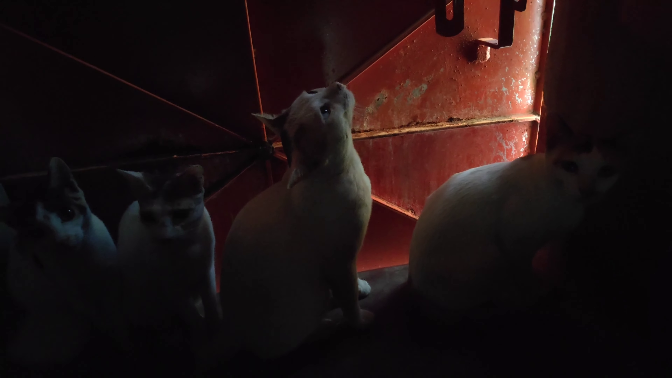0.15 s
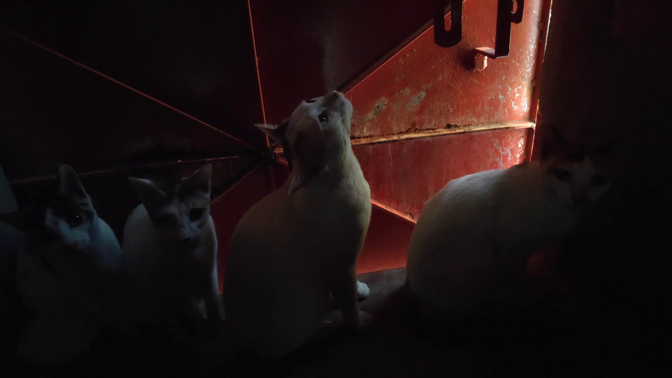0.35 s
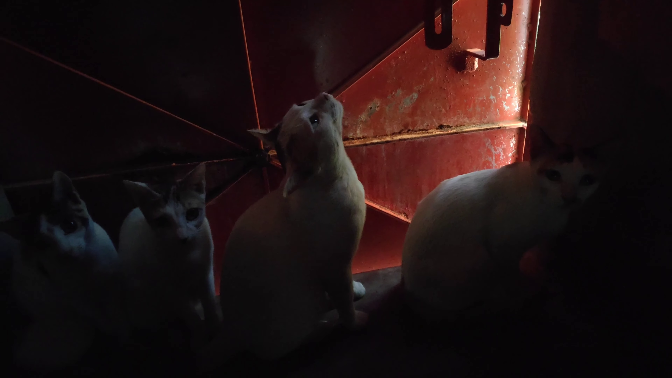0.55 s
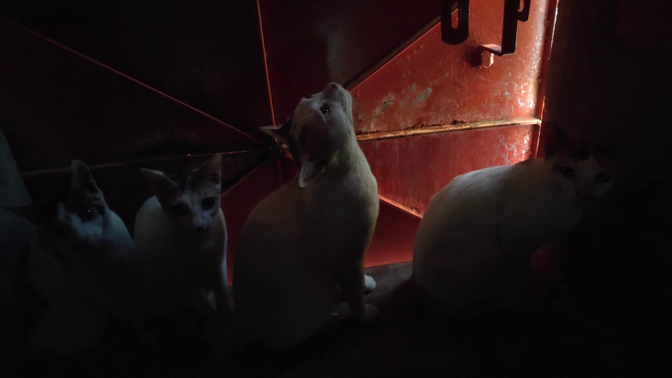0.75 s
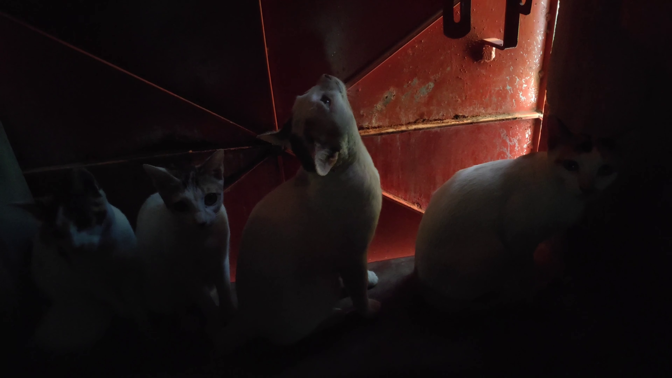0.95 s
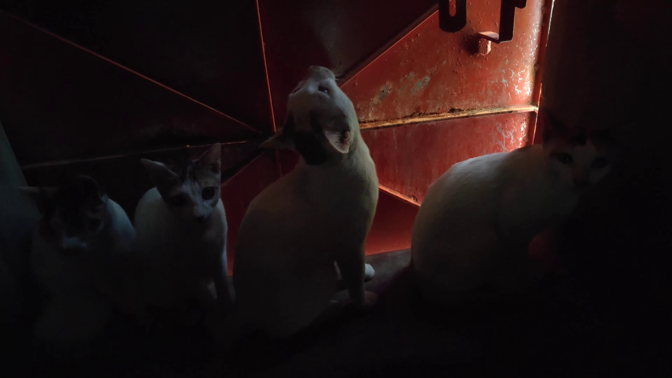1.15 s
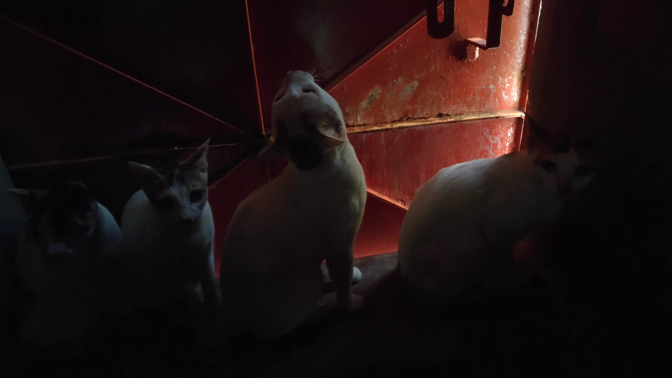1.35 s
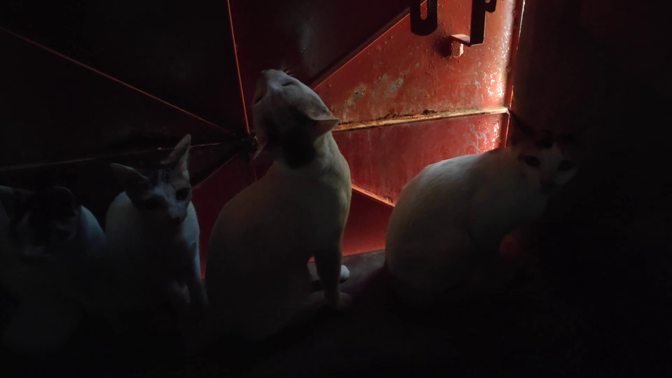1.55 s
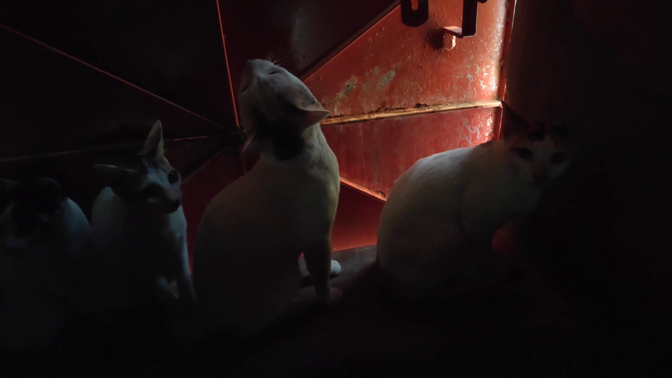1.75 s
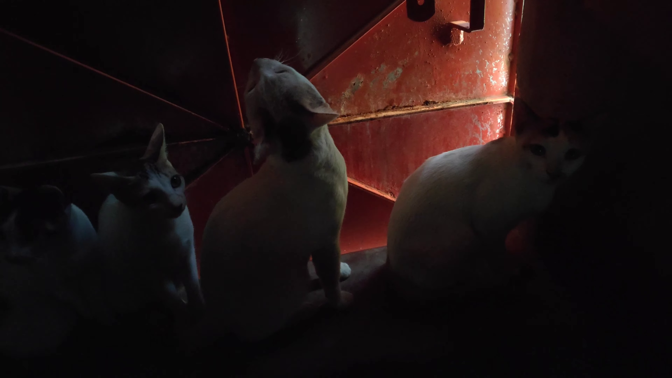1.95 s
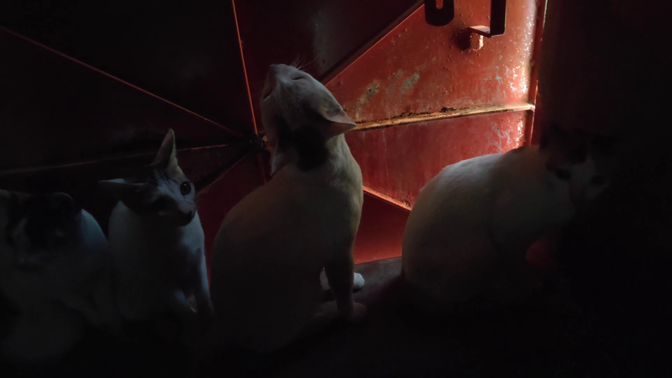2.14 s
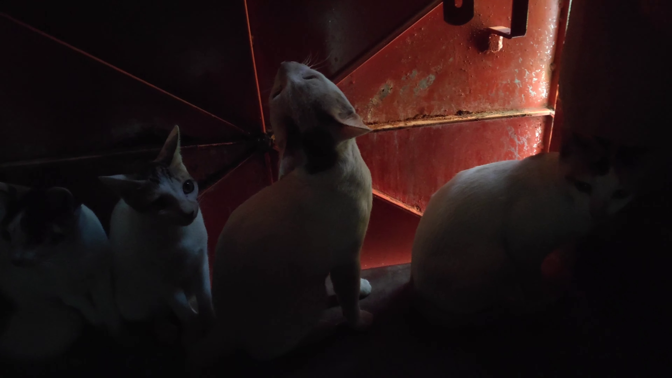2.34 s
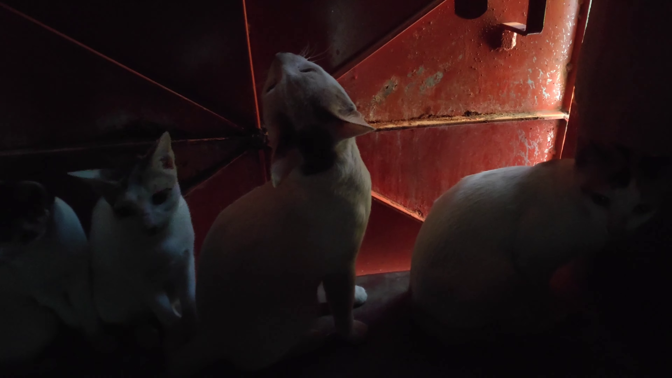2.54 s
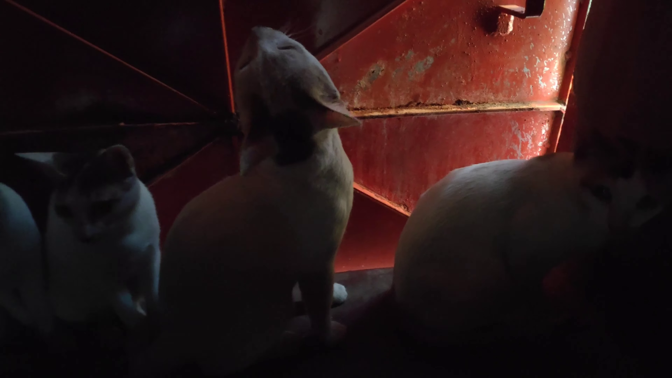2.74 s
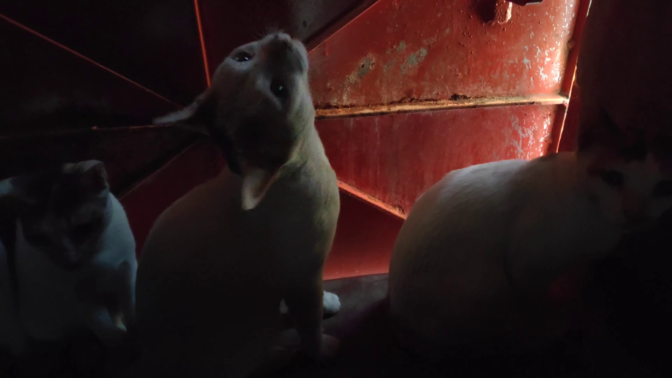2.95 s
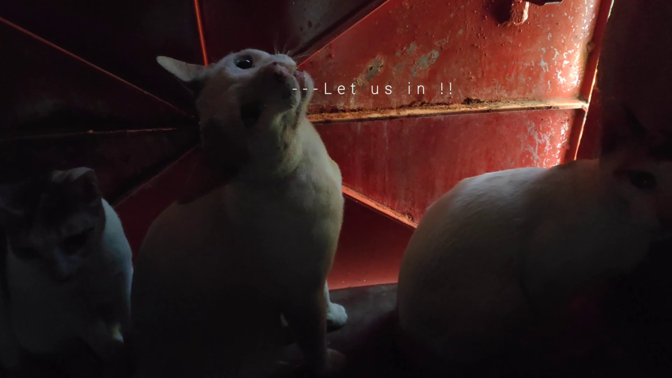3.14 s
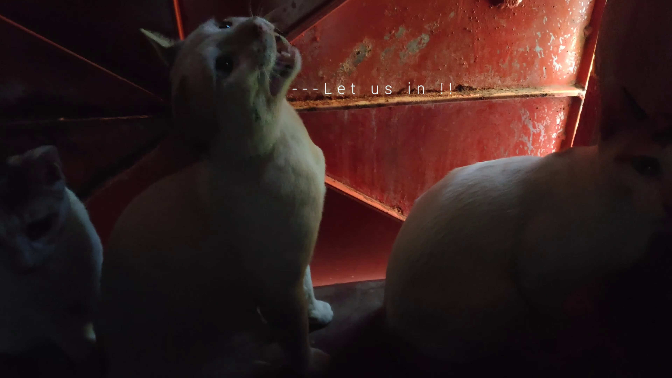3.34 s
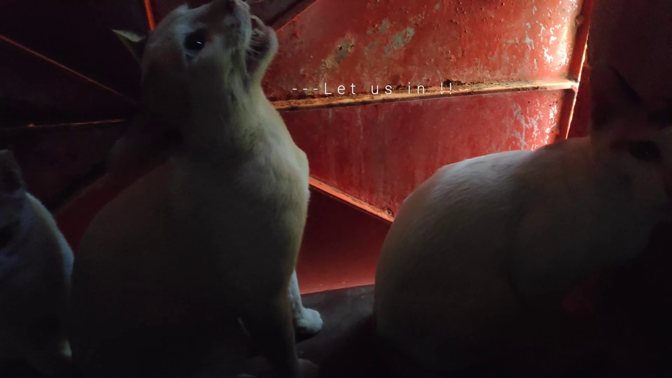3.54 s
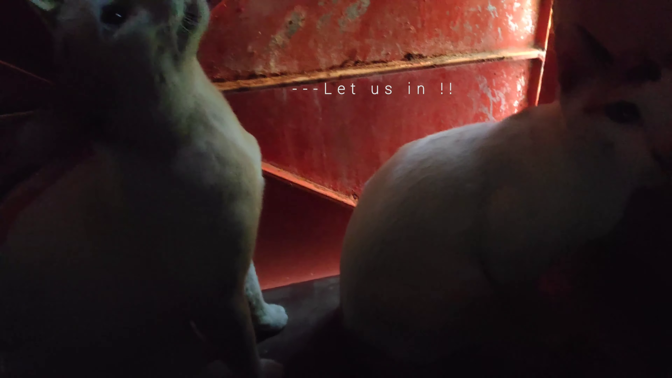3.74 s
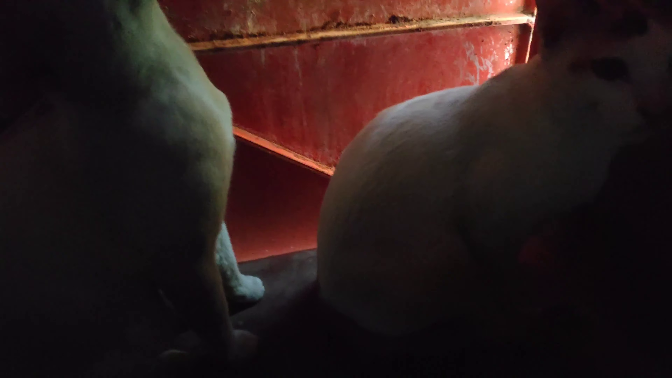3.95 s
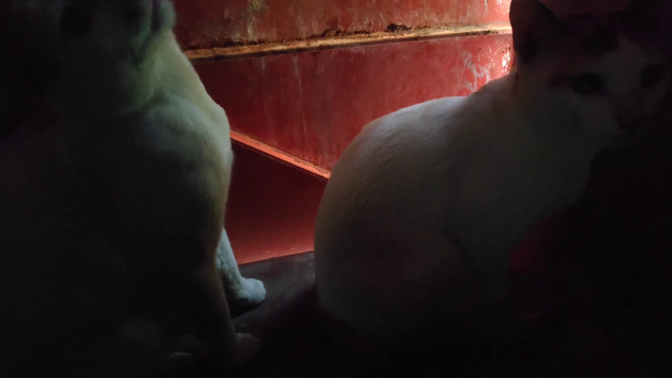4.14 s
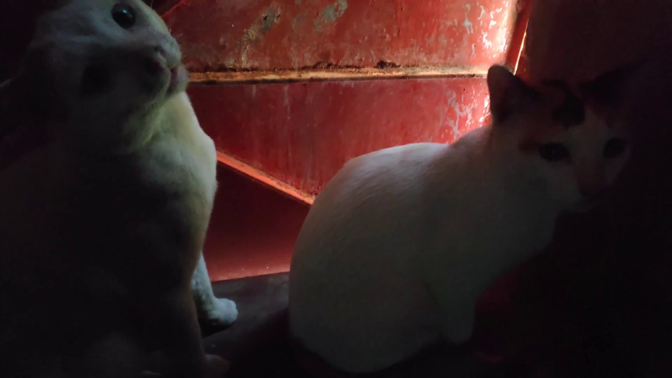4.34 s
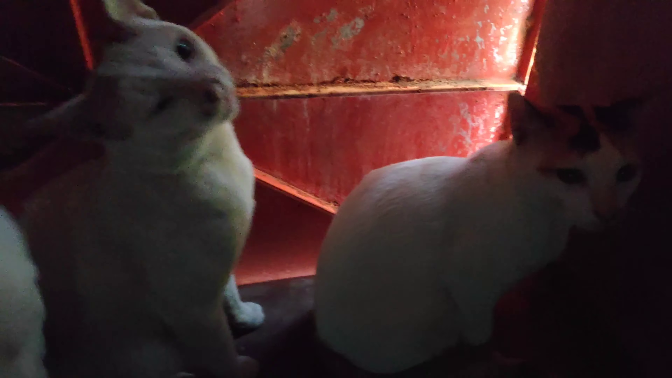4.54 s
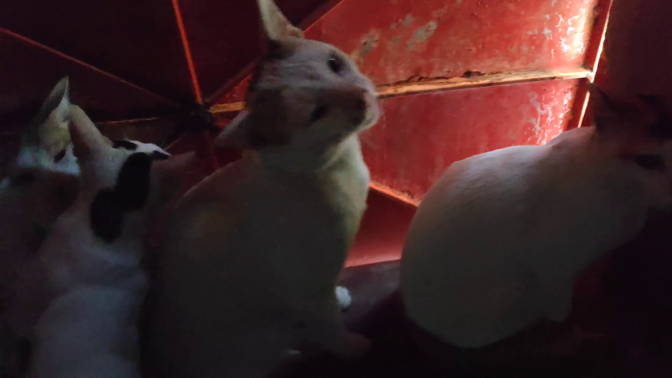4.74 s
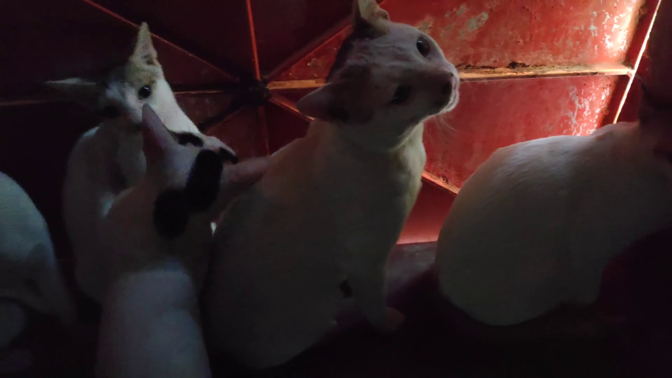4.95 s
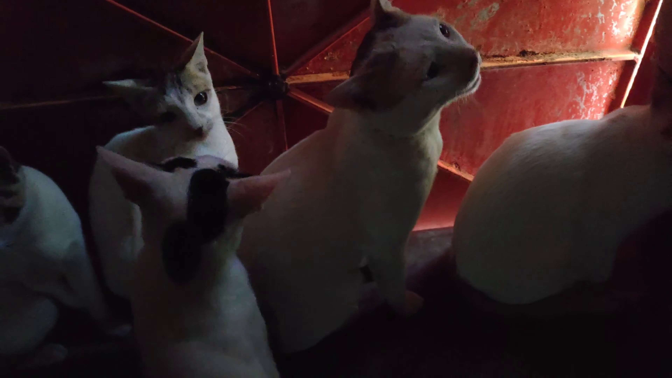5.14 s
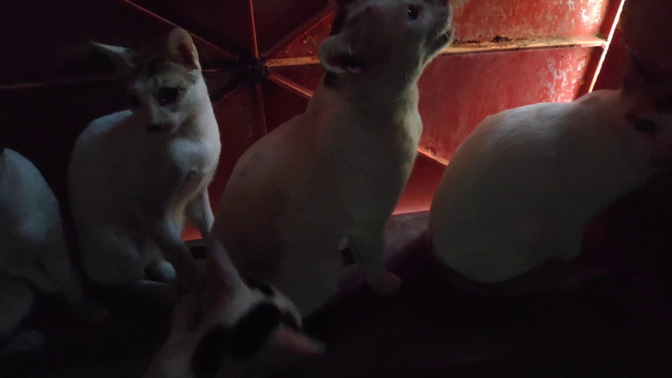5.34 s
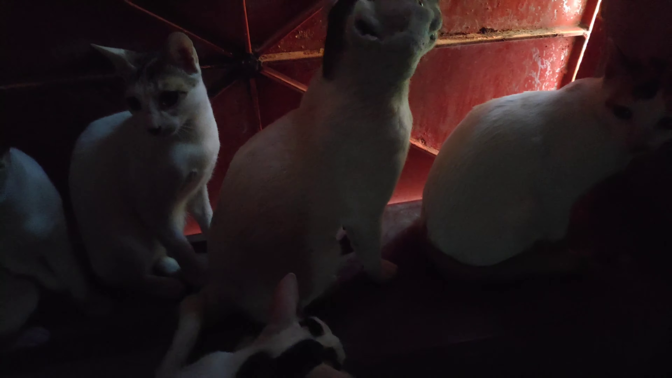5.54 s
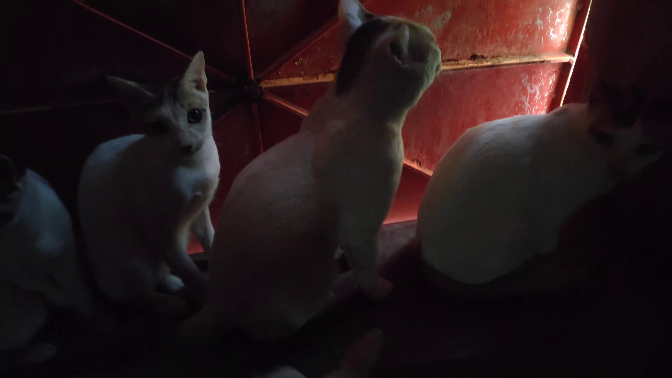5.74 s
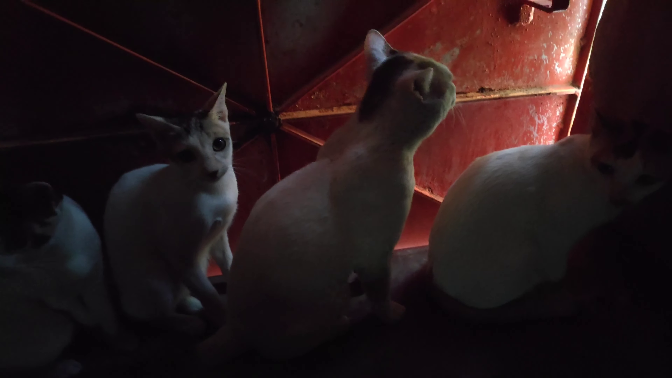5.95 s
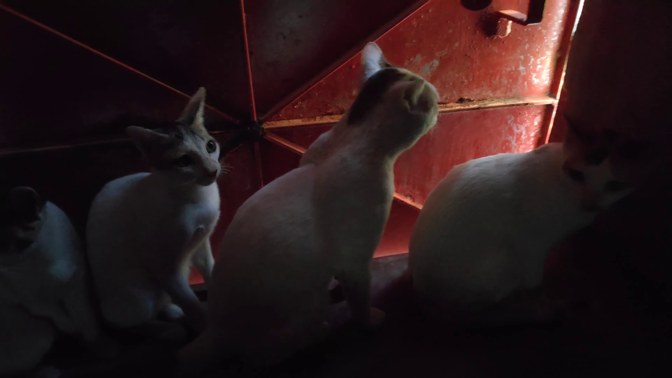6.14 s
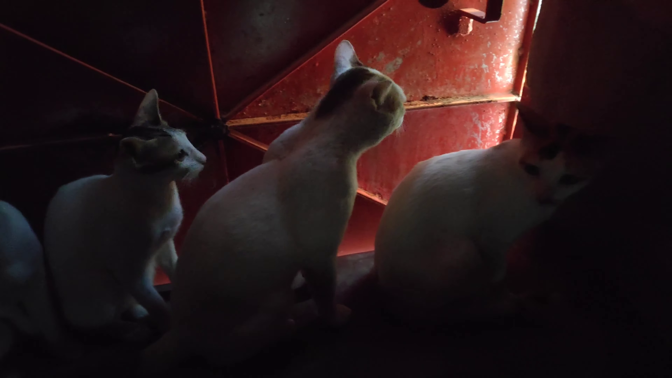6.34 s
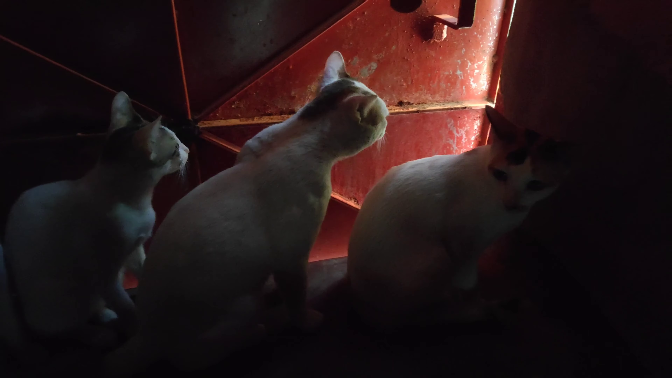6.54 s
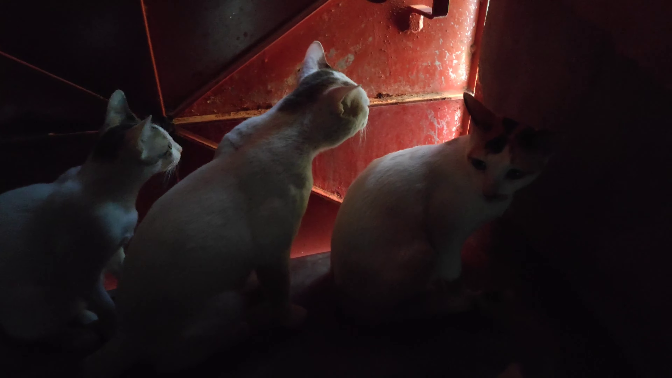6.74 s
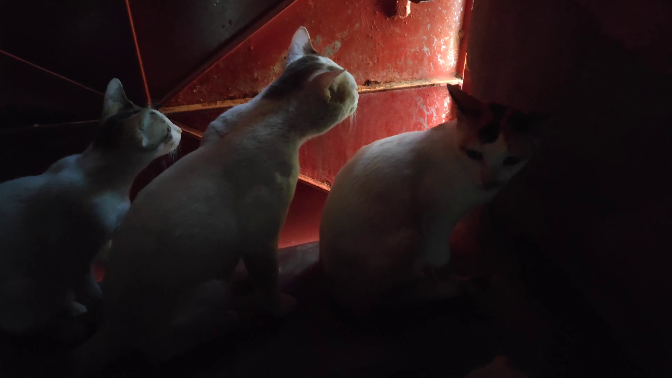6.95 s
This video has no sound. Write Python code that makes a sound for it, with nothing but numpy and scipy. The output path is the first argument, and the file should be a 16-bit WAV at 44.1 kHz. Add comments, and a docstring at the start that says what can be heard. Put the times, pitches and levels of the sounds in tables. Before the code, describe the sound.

A low rumble and hum from outside run throughout under a faint hiss of air, heard inside a hard, echoing shed. An engine idles faintly, growing until about 4.5 seconds. Two very faint, distant squeaks rise near 0.3 and 1.9 seconds, the first with a soft hiss. A cat gives a clear half-second meow at 1.1 seconds. Short hisses and tiny ticks follow between 2.4 and 2.8 seconds. The longest, loudest meow lasts from 3.2 to 4.1 seconds, dropping in pitch at the end and ringing on briefly in the room. More hisses and ticks come around 4.5 seconds. A third drawn-out meow rises and falls from 5.1 to 5.7 seconds, while low drones come and go outside between 4.5 and 6.6 seconds. A softer, higher meow starts at 6.8 seconds and carries on to the end, just after 7 seconds.

```python
"""A low rumble and hum from outside come first, over a faint hiss of air, and swell with an idling engine.
Cats wait at a sheet-metal door in a hard, echoing shed and meow four times, clear and drawn out:
their vocal folds supply harmonics, which the resonances of nose, throat and mouth filter.
Short hisses and ticks come from among them, and two faint squeaks rise far off.
The second meow's last note rings on in the shed; then low drones come and go outside."""
import sys
import numpy as np
from scipy import signal
from scipy.fft import rfft, irfft
from scipy.io import wavfile
from scipy.ndimage import uniform_filter1d

SR = 44100
rng = np.random.default_rng(int(sys.argv[2]) if len(sys.argv) > 2 else 0)


def digitize_waveform(pressure):
    """Quantize a signal to 16-bit integers and store it at the path in sys.argv[1].

    Rows of a 2-D input are taken as channels; values are limited to [-1, 1].
    """
    field = np.atleast_2d(pressure).T
    bounded = np.clip(field, -1, 1)
    quanta = np.round(bounded * 32767).astype(np.int16)
    wavfile.write(sys.argv[1], SR, quanta)


N = 312228
T = np.arange(N) / SR


def gain_of(db):
    return 10 ** (np.asarray(db) / 20)


def unit_rms(x):
    return x / np.sqrt(np.mean(x ** 2) + 1e-20)


def curve_at(points, hz, beyond=None):
    """Interpolation on a logarithmic frequency axis."""
    f, value = np.transpose(points)
    return np.interp(np.log(hz + 1), np.log(f + 1), value, beyond, beyond)


def wander(rate_hz, size):
    """Low-pass noise: a random drift of rms 1."""
    width = max(int(SR / rate_hz), 2)
    return unit_rms(uniform_filter1d(uniform_filter1d(rng.standard_normal(size), width), width))


def resonance(modes, hz):
    """Power addition: the joint gain of steep resonance peaks."""
    return np.sqrt(sum(gain_of(2 * db) / (1 + (2 * (hz - f) / width) ** 2) ** 2
                       for f, width, db in modes))


# likeness of left and right: (frequency [Hz], coherence [0-1])
COHERENCE = [(30, 0.99), (150, 0.98), (300, 0.68), (600, 0.68), (1200, 0.022), (3000, 0.017)]

def stereo_noise(spectrum, frame, patch_db):
    """Partial coherence: shaped noise of rms 1 with drifting patches, alike in both ears in the bass."""
    hop = frame // 4
    hz = np.fft.rfftfreq(frame, 1 / SR)
    a, b, c, d, patches = rng.standard_normal((N // hop + 5, len(hz), 5)).T
    patches = unit_rms(uniform_filter1d(uniform_filter1d(patches, 8, 0), 8, 1))
    coherence = curve_at(COHERENCE, hz)[:, None]
    left = a + 1j * b
    right = coherence * left + np.sqrt(1 - coherence ** 2) * (c + 1j * d)
    bins = np.array([left, right]) * spectrum(hz)[:, None] * gain_of(patch_db * patches)
    return unit_rms(signal.istft(bins, nperseg=frame, noverlap=frame - hop)[1][:, :N])


# background swell: (time [s], rumble base level [dB], air level [dB])
SWELL = [(0, -53.5, -63), (.6, -59, -64), (1.1, -55, -60.5), (1.6, -63.5, -60.5), (2.1, -55.5, -61.5),
         (2.7, -56.5, -58), (3.3, -56.5, -54), (3.7, -56, -56), (4.2, -50.5, -52), (4.5, -49, -55.5),
         (5, -50.5, -54.5), (5.4, -49, -50.5), (5.8, -50.5, -55.5), (6.202, -52.5, -60), (6.599, -52, -61),
         (7.08, -47.5, -58.5)]
# noise spectra: (frequency [Hz], relative density [dB])
DEEP_SPECTRUM = [(12, -4), (25, 5.5), (36, 3), (50, 4.5), (62, -11), (75, -18)]
MURMUR_SPECTRUM = [(150, 6), (165, -1.5), (200, 5.5), (232, -1), (260, 2), (330, -10.5), (400, -7)]
AIR_SPECTRUM = [(180, -61), (300, -1.5), (370, -3), (395, -38), (428, -2), (641, -4), (1110, -9.5),
                (3230, -10.5), (4390, -14), (10200, -19), (14300, -29.5)]
# narrow noise bands, heard as wavering tones: (frequency [Hz], width [Hz], gain [dB])
HUM_BANDS = [(73, 14, -0.5), (94, 35, 3.5), (119.9, 12, 5), (148, 32, -29)]

def outside():
    """Common amplitude modulation: noise bands of rumble, hum and murmur swell together under air hiss."""
    s, rumble_db, air_db = np.transpose(SWELL)
    deep_db = rumble_db.max() + 1.22 * (rumble_db - rumble_db.max()) - 1.5  # swings wider than the hum
    hum_db = rumble_db - 0.3
    murmur_db = rumble_db + .45 * (air_db - rumble_db) - 6  # follows both rumble and air
    deep = stereo_noise(lambda hz: gain_of(curve_at(DEEP_SPECTRUM, hz, -86)), 4096, patch_db=0.88)
    hum = stereo_noise(lambda hz: resonance(HUM_BANDS, hz), 4096, patch_db=1.0)
    murmur = stereo_noise(lambda hz: gain_of(curve_at(MURMUR_SPECTRUM, hz, -74)), 4096, patch_db=2.3)
    air = stereo_noise(lambda hz: gain_of(curve_at(AIR_SPECTRUM, hz, -85)), 1024, patch_db=1.0)
    layers = (deep_db, deep), (hum_db, hum), (murmur_db, murmur), (air_db, air)
    return sum(gain_of(np.interp(T, s, db)) * layer for db, layer in layers)


def tone(start, length, slide, first_hz, last_hz, db):
    """Frequency modulation: a wavering sine slides to its pitch as it swells and fades."""
    progress = np.clip((T - start) / length, 0, 1)
    hz = first_hz + (last_hz - first_hz) * np.minimum(progress * length / slide, 1)
    cycles = np.cumsum(hz * (1 + 0.0083 * wander(51, N))) / SR
    return gain_of(db) * np.abs(np.sin(np.pi * progress)) ** .9 * np.sin(2 * np.pi * cycles)


# two far squeaks, then the ring of the second meow's last note:
# (start [s], length [s], slide [s], first pitch [Hz], last pitch [Hz], level [dB])
SQUEAKS_AND_RING = [(.26, .065, .03, 3800, 4220, -69), (1.85, .27, .11, 3700, 5520, -84),
                    (4.08, .24, .1, 806, 808, -51)]

def squeaks_and_ring():
    """Pure tones: two faint, rising squeaks, and a steady tone for the meow ringing on in the shed."""
    return sum(tone(*row) for row in SQUEAKS_AND_RING)


# bursts of air: (start [s], rise [s], hold [s], level [dB], 60 dB decay time [s])
HISS_BURSTS = [(0.283, 0.019, 0.058, -55.5, .6), (1.594, .01, .03, -61.5, 0.27),
               (2.391, 0.0099, 0.007, -45.5, 0.23), (2.414, 0.013, 0.0091, -43, 0.7),
               (2.476, .04, .1, -44, 0.47), (2.716, .03, 0.12, -61.5, 5.7), (2.745, .006, .005, -47, 0.11),
               (4.327, 0.029, 0.032, -58.5, 0.36), (4.427, .035, 0.069, -56.5, .6),
               (4.585, 0.0045, 0.0076, -52, 0.2), (4.595, 0.015, .006, -43, 0.37),
               (4.944, 0.0055, .005, -57, .25), (5.17, 0.067, 0.055, -53, .2),
               (6.118, 0.0094, .01, -65, .35)]
# their spectrum: (frequency [Hz], relative density [dB])
HISS_SPECTRUM = [(470, -41), (800, -9.5), (2550, -6), (3440, -4), (3750, -16), (3980, 0.5), (5510, 3),
                 (10700, 1.5), (14300, -8)]

def hisses():
    """Broadband air noise: bright, fluttering bursts rise, hold and decay exponentially."""
    envelope = np.zeros(N)
    for start, rise, hold, db, t60 in HISS_BURSTS:
        attack = np.clip((T - start) / rise, 0, 1) ** 2
        envelope += attack * gain_of(db - 60 * np.maximum(T - start - rise - hold, 0) / t60)
    flutter = gain_of(0.34 * wander(83, N))
    air = stereo_noise(lambda hz: gain_of(curve_at(HISS_SPECTRUM, hz)), 256, patch_db=1.0)
    return uniform_filter1d(envelope, 200) * flutter * air


# idling outside: (time [s], rotation rate [Hz], level [dB])
ENGINE_IDLE = [(.3, 23.6, -61), (1.3, 23.6, -56), (1.9, 24.1, -61), (2.3, 23.8, -60), (2.6, 22.2, -58),
               (3.1, 22.6, -53), (4.2, 23.2, -48), (4.6, 23.3, -50)]
# engine harmonics: (order [multiple of the rotation rate], relative level [dB])
ENGINE_ORDERS = [(1, -16), (2, -11), (3, -2), (4, -2), (5, 0), (6, -3), (7, -5), (8, -9), (9, -9), (10, -4),
                 (11, -9), (12, -14)]

def engine():
    """Periodic excitation: an engine sounds at multiples of its rotation rate, each swelling alone."""
    s, rotation_hz, db = np.transpose(ENGINE_IDLE)
    turns = np.cumsum(np.interp(T, s, rotation_hz)) / SR
    orders = sum(gain_of(order_db + 4.1 * wander(4.8, N)) * np.sin(2 * np.pi * (k * turns + rng.random()))
                 for k, order_db in ENGINE_ORDERS)
    fade = np.clip(np.minimum(T - s[0], s[-1] - T) / 0.15, 0, 1)
    return fade * gain_of(np.interp(T, s, db)) * unit_rms(orders)


# one contour a meow: (time [s], pitch [Hz], effort [dB], mouth opening [0-1], treble level [dB])
MEOW_CONTOURS = [
    [(1.125, 666, -53, 0.8, -72), (1.145, 659, -35, 0.51, -72), (1.17, 638, -39.5, 0.53, -68),
     (1.19, 586.4, -37, 0.56, -62), (1.27, 567.7, -35.5, 0.56, -56), (1.36, 549.3, -36.5, 0.65, -60),
     (1.4, 585.6, -40.5, 0.48, -64), (1.46, 582.6, -41, .4, -66), (1.53, 560, -44, 0.82, -62.5),
     (1.575, 534.4, -56.5, 0, -68), (1.595, 490, -52.5, 0, -64), (1.63, 491, -64, .3, -56)],
    [(3.229, 599.5, -36, 0.2, -75), (3.245, 586.5, -33.5, 0.53, -55), (3.27, 558.6, -34, 0.27, -49),
     (3.3, 559, -33.5, 0.3, -47.5), (3.33, 563.8, -33.5, 0.59, -43.5), (3.4, 562, -33, 0.96, -44),
     (3.44, 558.5, -38.5, 0.95, -43.5), (3.52, 551.5, -34.5, 1, -43.5), (3.575, 548.7, -36, 1, -45.5),
     (3.62, 561.6, -38.5, 0.67, -48), (3.7, 567.1, -35.5, 0.52, -54), (3.82, 562.8, -39.5, 0.4, -52),
     (3.92, 564.5, -34.5, .25, -56), (3.96, 543.7, -36.5, 0.17, -56), (4.02, 500, -38.5, 0.01, -59.5),
     (4.08, 452, -44, 0, -62), (4.11, 405, -45, 0, -69)],
    [(5.06, 489, -48.5, 0, -63), (5.1, 446.7, -41, 0.27, -71), (5.17, 488, -41.5, 0.47, -59.5),
     (5.27, 515.5, -41, 0.77, -54), (5.35, 563.8, -39, 0.9, -46.5), (5.48, 571.3, -41, 1, -51.5),
     (5.58, 553, -40, 0.98, -55), (5.63, 535, -45.5, .6, -57.5), (5.68, 511.3, -38.5, 0.36, -63),
     (5.71, 404.4, -55.5, 0.86, -67), (5.74, 384, -39, 0.4, -66)],
    [(6.757, 678, -68, 0.6, -79), (6.775, 692, -44, 0.36, -75), (6.8, 682.5, -44.5, 0.45, -73),
     (6.84, 651, -48.5, 0.66, -77), (6.9, 658, -49.5, 0.63, -79), (6.95, 673.5, -46.5, 0.45, -80),
     (6.99, 693.6, -45.5, 0.5, -84), (7.08, 694.5, -44, 0.61, -81)],
]
# one voice a meow: (left minus right [dB], mouth tuning [ratio], teeth tuning [ratio], breath [dB],
# then open-mouth gains on the effort: nose [dB], throat [dB], palate [dB], mouth [dB], teeth [dB])
CAT_VOICES = [(-0.5, 1.03, 0.897, -5, -10, -5, -18, -12, -14.5),
              (2.5, 1.002, 1.042, -8.5, -30.5, -3, -5, 8.5, -0.5),
              (1.1, 1.006, 1.02, -4.5, -17.5, -1, -2.5, 6.5, -5.5),
              (-4.5, 0.914, 0.98, -8, -10, 4.5, -17, 10.5, -8)]
# gain change as the mouth shuts: (nose [dB], throat [dB], palate [dB], mouth [dB], teeth [dB])
SHUT_CHANGE_DB = [15.5, -1.4, -7, -44.5, -28]
# vocal tract resonances: (nominal frequency [Hz], width [Hz], relative gain [dB])
NOSE_MODES = [(496, 406, 4)]
THROAT_MODES = [(1078, 394, 0.0064)]
PALATE_MODES = [(1700, 760, 0.1)]
MOUTH_MODES = [(2250, 330, 0)]
TEETH_MODES = [(3020, 240, -48), (3060, 460, 0), (3810, 850, -4.5), (4530, 230, -6.5)]
TREBLE_MODES = [(5280, 210, 3), (5694, 220, 0.5), (5920, 420, -2), (7000, 1230, -8), (7970, 1200, -9),
                (11700, 1700, -21)]
BREATH_MODES = [(6200, 2400, 3), (9400, 3800, -10), (12200, 6100, -8)]

def meow(contour, mouth_tuning, teeth_tuning, breath_db, *open_db):
    """Source-filter principle: formants of the vocal tract weight vocal-fold harmonics and breath."""
    s, pitch, effort_db, mouth_open, treble_db = np.transpose(contour)
    t = T[(T >= s[0]) & (T < s[-1])]
    shut = 1 - np.interp(t, s, mouth_open)
    formant_db = [np.interp(t, s, effort_db) + db + change * shut
                  for db, change in zip(open_db, SHUT_CHANGE_DB)]
    formant_db.append(np.interp(t, s, treble_db))
    mouth = [(f * mouth_tuning, width, db) for f, width, db in MOUTH_MODES]
    teeth = [(f * teeth_tuning, width, db) for f, width, db in TEETH_MODES]
    formants = zip((NOSE_MODES, THROAT_MODES, PALATE_MODES, mouth, teeth, TREBLE_MODES), formant_db)

    hz = np.interp(t, s, pitch) * (1 + 0.00318 * wander(64.6, len(t)))  # the vocal folds tremble
    cycles = np.cumsum(hz) / SR
    k = np.arange(1, 25)[:, None]  # harmonic numbers
    sink = np.minimum(hz / np.median(hz), 1) ** 0.23  # formants sink as the mouth closes on low notes
    weight = np.sqrt(sum((gain_of(db) * resonance(modes, k * hz / sink)) ** 2 for modes, db in formants))
    flicker_db = np.minimum(.5 + .3 * k, 2.5) * wander(25, weight.shape)
    rasp_db = np.minimum(.12 * k * k, 3.8) * wander(250, weight.shape)
    harmonics = np.sqrt(2) * np.cos(2 * np.pi * k * cycles + k * k)
    voice = (weight * gain_of(flicker_db + rasp_db) * harmonics).sum(0)

    # air escapes in a puff each cycle and takes the colour of the upper resonances
    puffs = rng.standard_normal(len(t)) * (1 + .5 * np.cos(2 * np.pi * cycles))
    bin_hz = np.fft.rfftfreq(len(t), 1 / SR)
    upper = (mouth, formant_db[3] - 9.5), (teeth, formant_db[4]), (BREATH_MODES, formant_db[5] + 2.5)
    breath = sum(gain_of(db) * unit_rms(irfft(rfft(puffs) * resonance(modes, bin_hz), len(t)))
                 for modes, db in upper)

    runs_to_end = t[-1] > T[-100]  # such a call does not fade out
    fade = np.minimum(1, np.minimum(t - t[0], t[-1] - t + runs_to_end) / 0.011)
    out = np.zeros(N)
    out[round(t[0] * SR):][:len(t)] = (voice + gain_of(breath_db) * breath) * fade
    return out


# tiny cracks: (time [s], level before the high-pass [dB])
TICK_EVENTS = [(2.4285, -36), (2.7487, -33), (2.7527, -35), (4.594, -36), (4.6135, -32), (4.9497, -50),
               (6.1245, -56)]

def ticks():
    """Short transients have broad spectra: bright cracks, as of a claw or tongue."""
    out, t = np.zeros(N), np.arange(600) / SR
    t60 = .008
    for start, db in TICK_EVENTS:
        out[round(start * SR):][:len(t)] += gain_of(db - 60 * t / t60) * rng.standard_normal(len(t))
    return signal.sosfilt(signal.butter(2, 3800, "high", fs=SR, output="sos"), out)


# drones outside: (start [s], length [s], slide [s], first pitch [Hz], last pitch [Hz], level [dB])
LOW_DRONES = [(4.45, .5, 0.19, 50, 51.8, -44.5), (5.038, .55, 0.36, 48.5, 50.5, -43),
              (5.75, 0.58, .3, 50.4, 51, -45.5), (4.84, 0.88, .5, 122.5, 121.3, -48),
              (5.587, 0.44, 0.2, 115.4, 118.7, -43.5), (6.1, 0.49, 0.48, 91.6, 91, -45)]

def drones():
    """Superposition: low, nearly steady tones overlap as they come and go."""
    return sum(tone(*row) for row in LOW_DRONES)


# reverberation of the shed: (frequency [Hz], 60 dB decay time [s])
SHED_DECAY = [(250, 1.7), (600, 0.87), (1200, 0.92), (2300, 0.85), (4000, 0.59), (8000, 0.42),
              (14000, 0.25)]

def shed(x):
    """Reverberation: echoes of random sign, one in every 20 samples, each band dying at its own rate."""
    echoes = np.zeros((2, SR))
    arrivals = np.arange(300, SR - 20, 20) + rng.integers(0, 20, (2, (SR - 301) // 20))
    np.put_along_axis(echoes, arrivals, rng.choice([-1., 1.], arrivals.shape), 1)
    hz, t, bins = signal.stft(echoes, SR, nperseg=256)
    coherence = curve_at(COHERENCE, hz)[:, None]  # long waves reach both microphones alike
    bins[1] = coherence * bins[0] + np.sqrt(1 - coherence ** 2) * bins[1]
    decay = gain_of(-60 * t / curve_at(SHED_DECAY, hz)[:, None])
    tail = signal.istft(bins * decay, SR, nperseg=256)[1]
    return signal.fftconvolve(x[None], tail / np.linalg.norm(tail[0]), axes=1)[:, :N]


# later arrival of the meows at the left microphone: (frequency [Hz], phase lag [rad])
LEFT_LAG = [(100, .1), (600, 0.52), (1130, 0.63), (1700, 3.75), (2230, 5.18), (3400, 7.5), (5600, 10.27),
            (14000, 24.1)]

def scene():
    """Direct and reverberant sound add to the background; level and phase cues place the cats."""
    calls = [meow(contour, *voice[1:]) for contour, voice in zip(MEOW_CONTOURS, CAT_VOICES)]
    direct = sum(call * gain_of([[voice[0] / 2], [-voice[0] / 2]])
                 for call, voice in zip(calls, CAT_VOICES))
    lag = curve_at(LEFT_LAG, np.fft.rfftfreq(N, 1 / SR))
    direct[0] = irfft(rfft(direct[0]) * np.exp(-1j * lag), N)
    small_sounds = ticks() + squeaks_and_ring()
    direct += hisses() + small_sounds
    reverberant = gain_of(-3) * shed(small_sounds) + gain_of(-6) * shed(sum(calls))
    return direct + reverberant + engine() + drones() + outside()


# balance of the microphone pair: (frequency [Hz], left minus right [dB])
MIC_BALANCE = [(60, 0), (500, 0.5), (1000, -0.5), (2400, 5.5), (5000, -1), (9000, 1), (14000, 15)]

def record(dry):
    """Frequency response: each microphone has its own colour, and a low-pass limits the band."""
    tilt_db = curve_at(MIC_BALANCE, np.fft.rfftfreq(N, 1 / SR)) / 2
    coloured = irfft(rfft(dry) * gain_of([tilt_db, -tilt_db]), N)
    low_pass = signal.firwin(801, cutoff=14330, window=("kaiser", 9), fs=SR)
    return signal.oaconvolve(coloured, low_pass[None], "same")


dry = scene()
out = record(dry)
digitize_waveform(out)
```